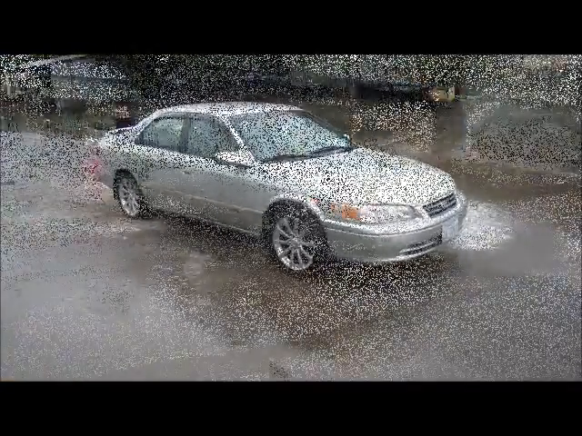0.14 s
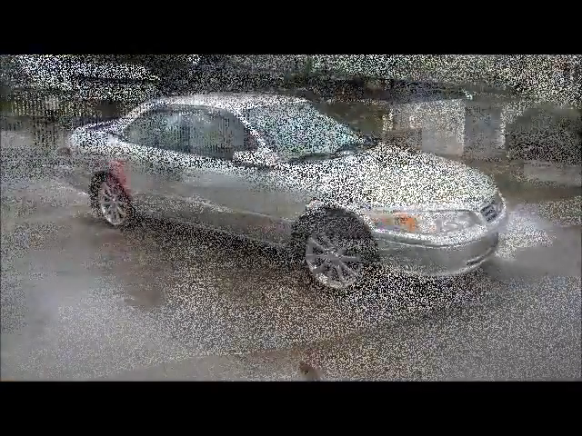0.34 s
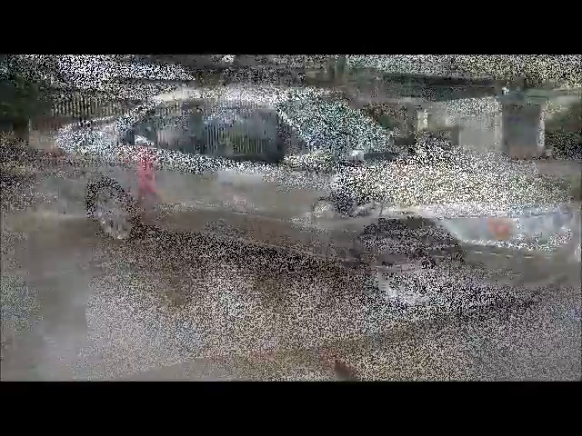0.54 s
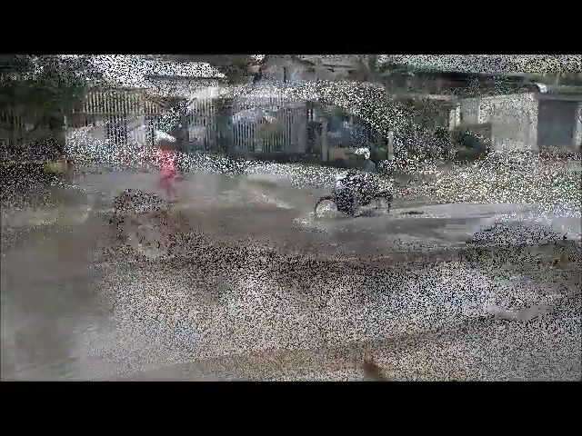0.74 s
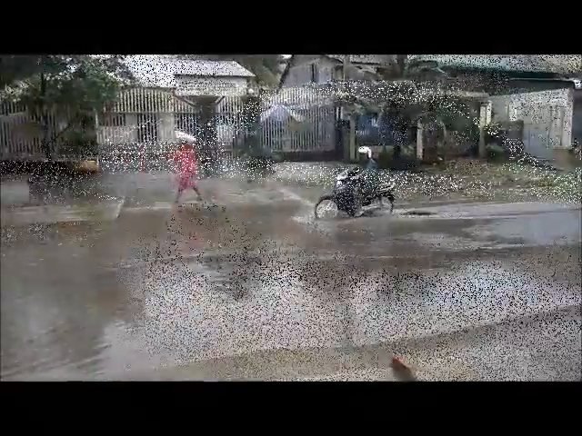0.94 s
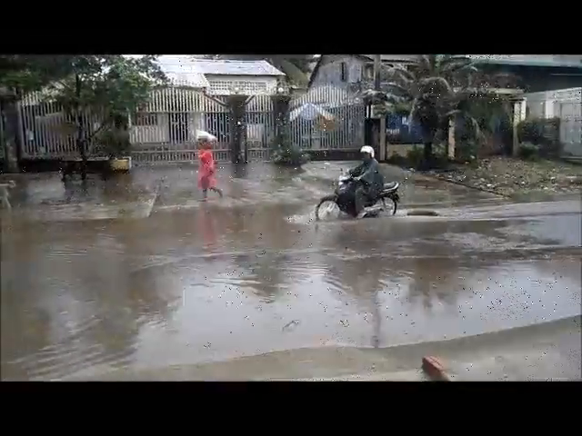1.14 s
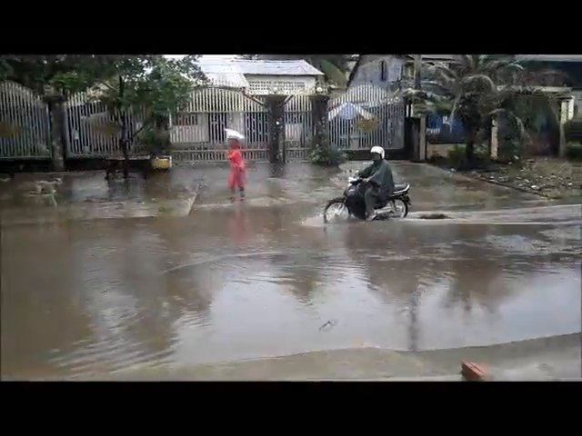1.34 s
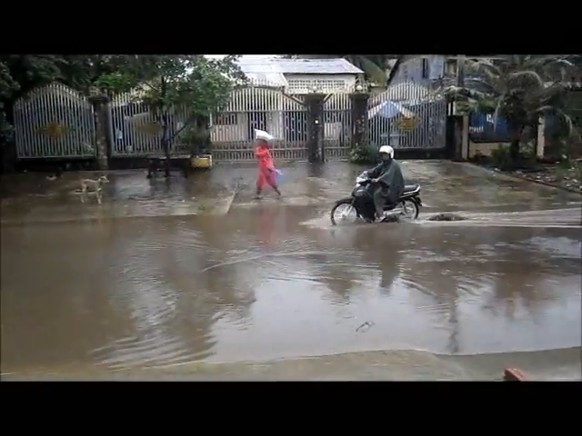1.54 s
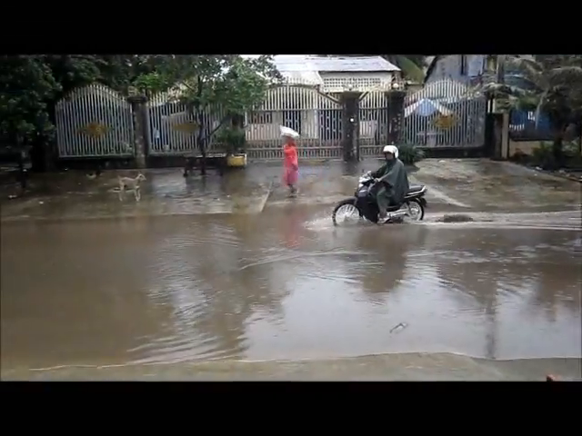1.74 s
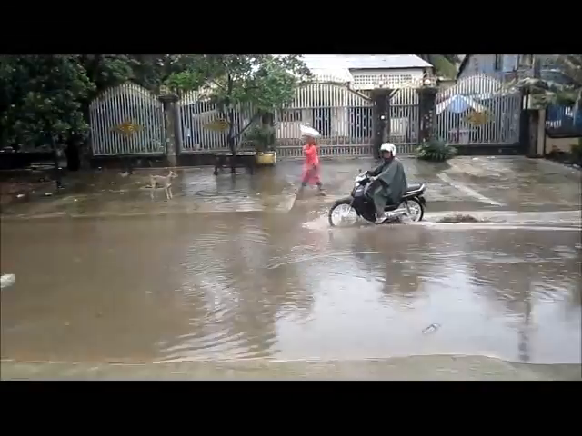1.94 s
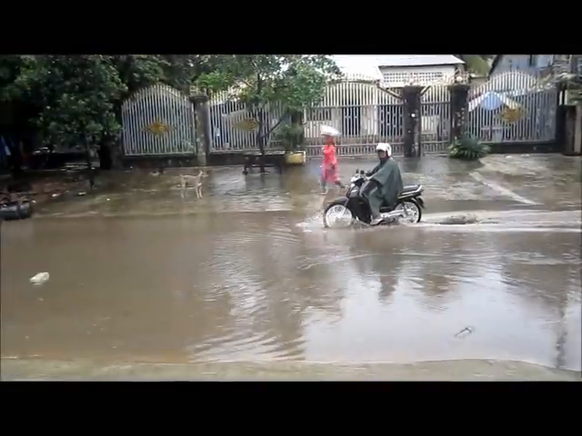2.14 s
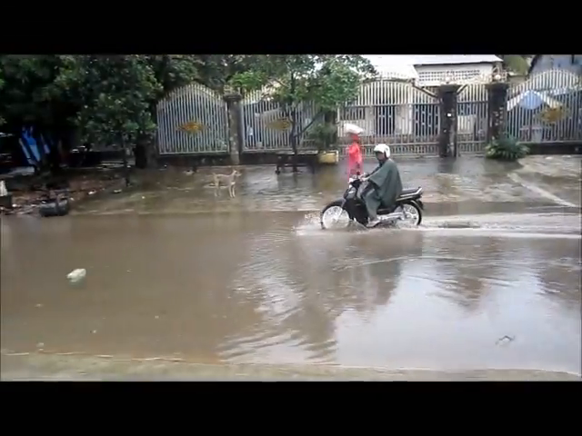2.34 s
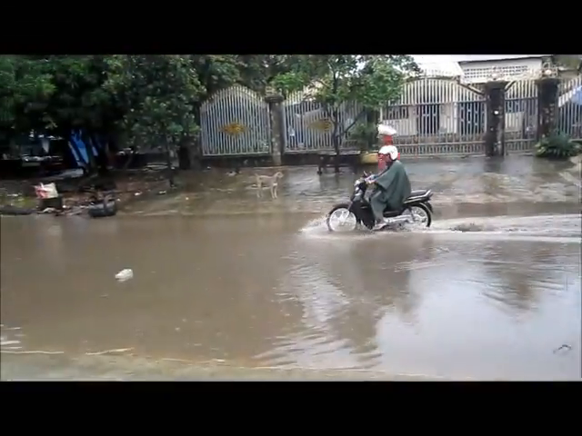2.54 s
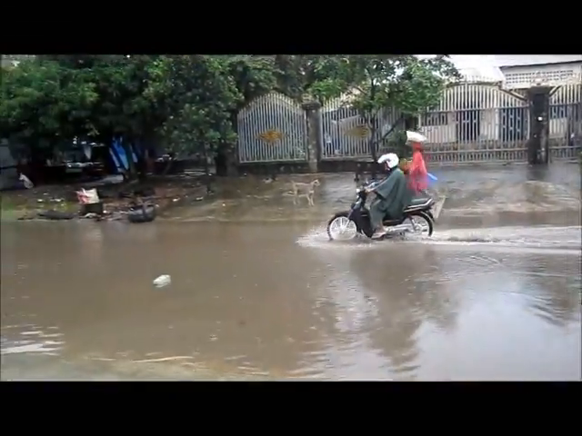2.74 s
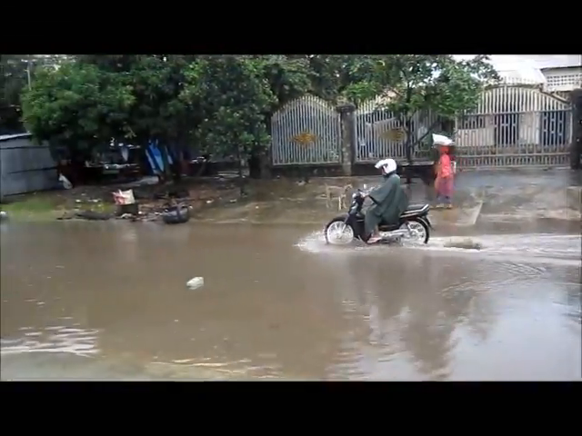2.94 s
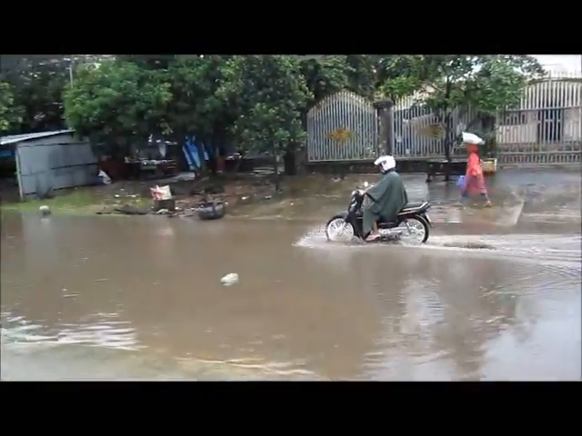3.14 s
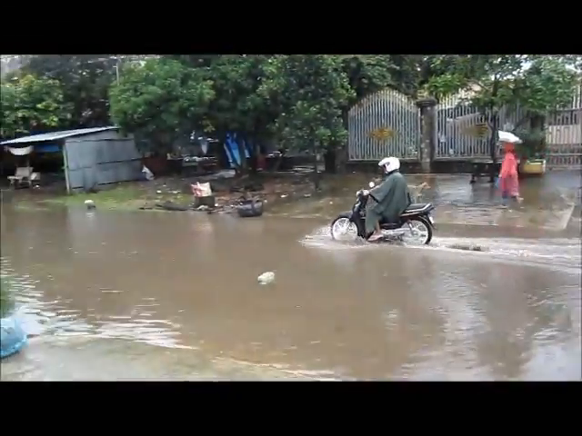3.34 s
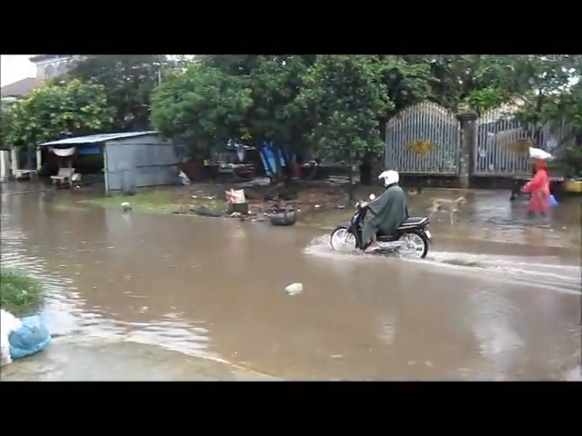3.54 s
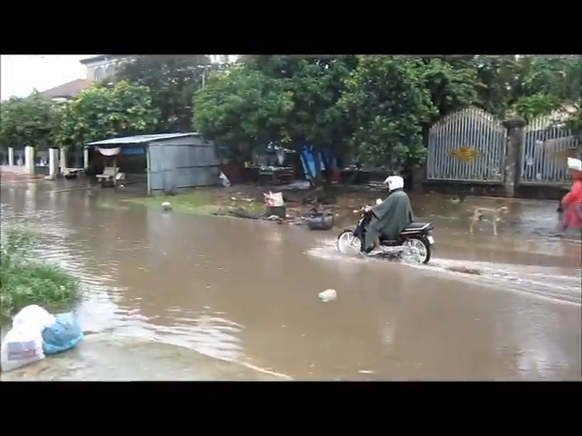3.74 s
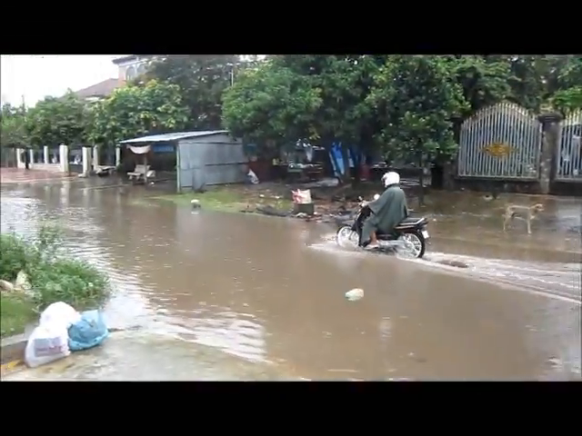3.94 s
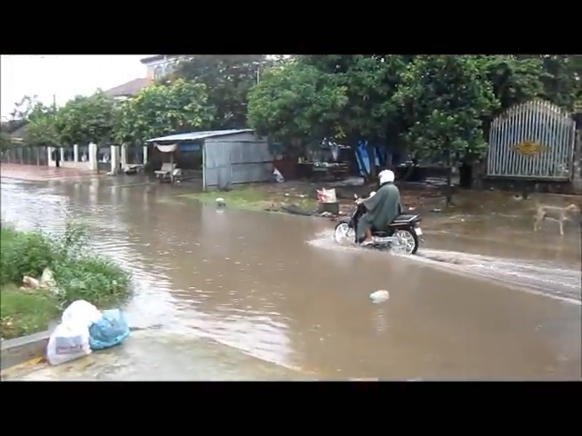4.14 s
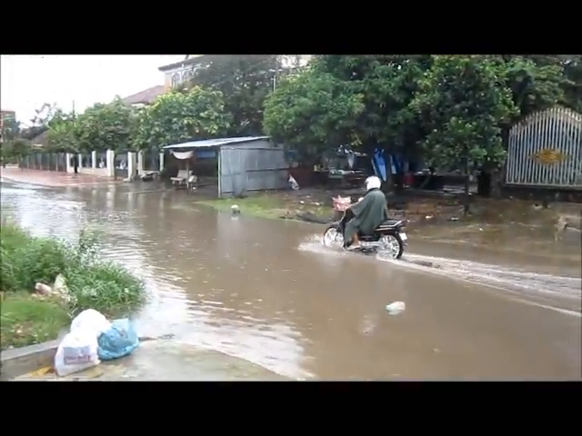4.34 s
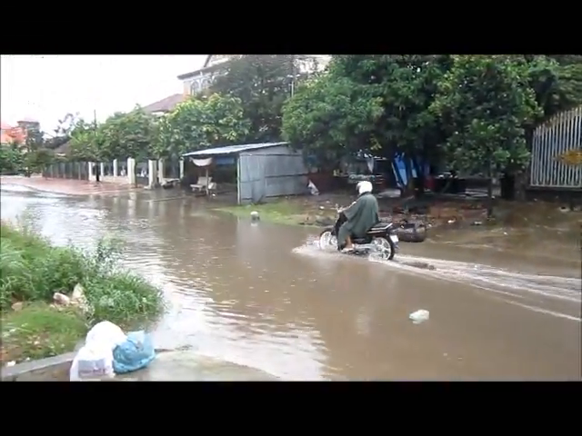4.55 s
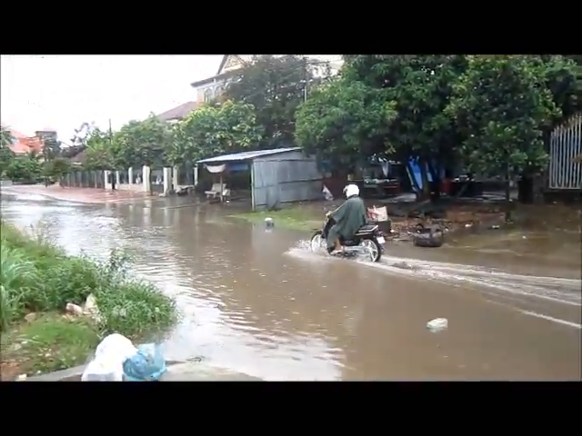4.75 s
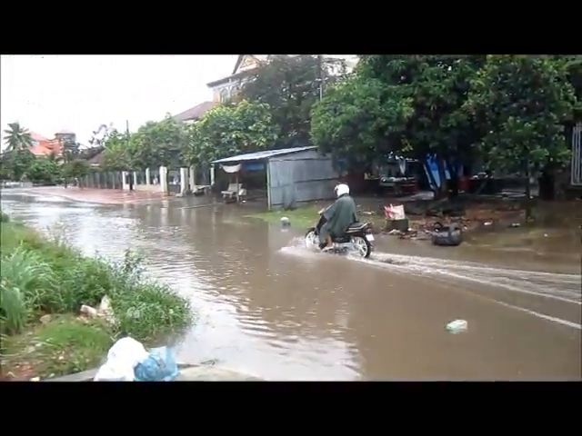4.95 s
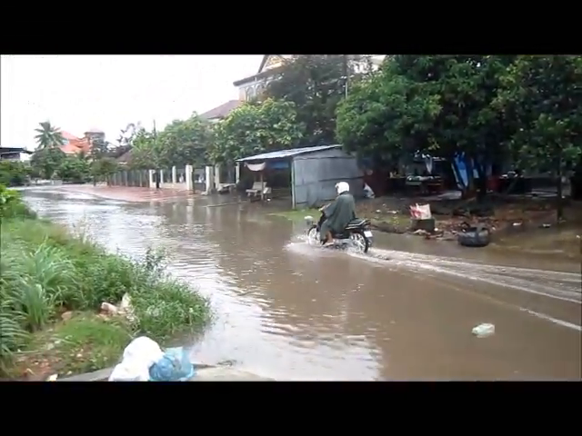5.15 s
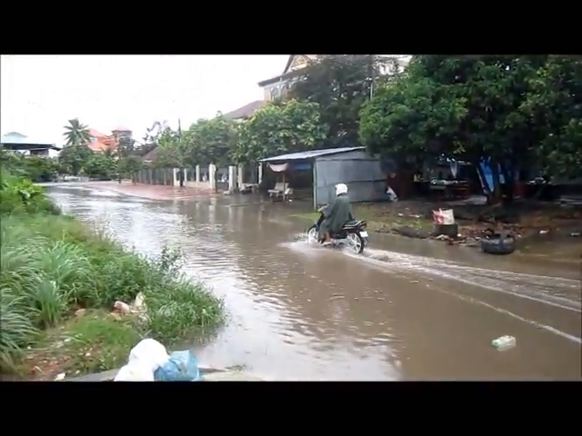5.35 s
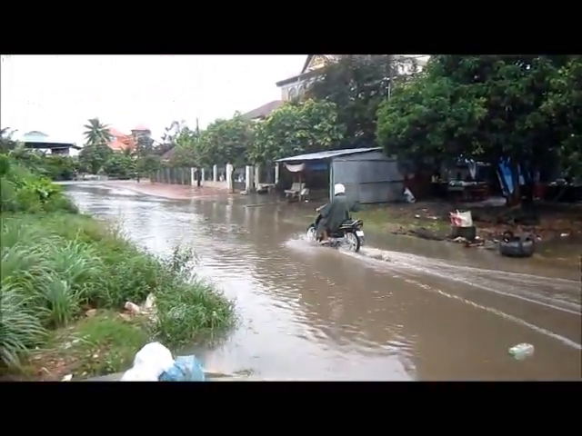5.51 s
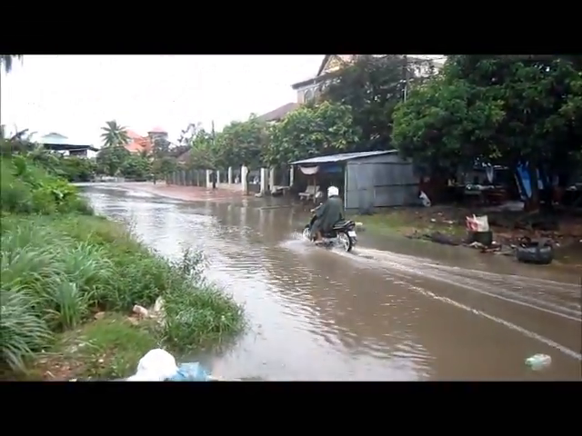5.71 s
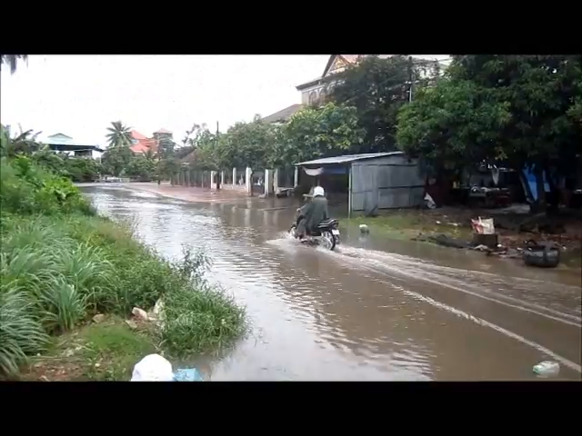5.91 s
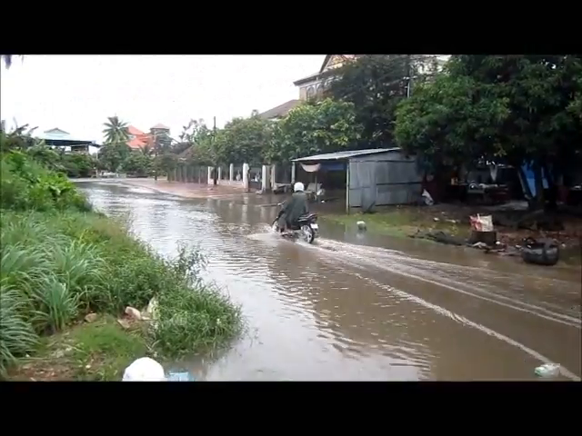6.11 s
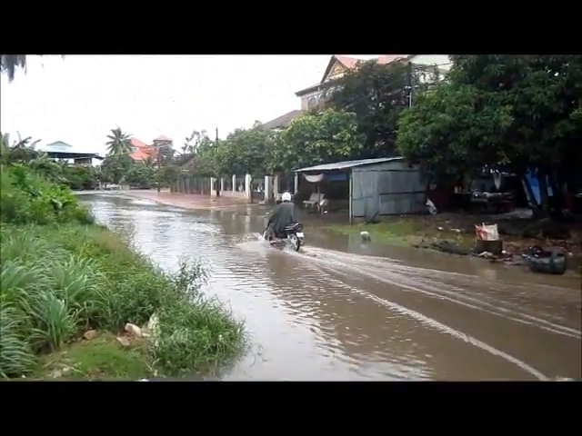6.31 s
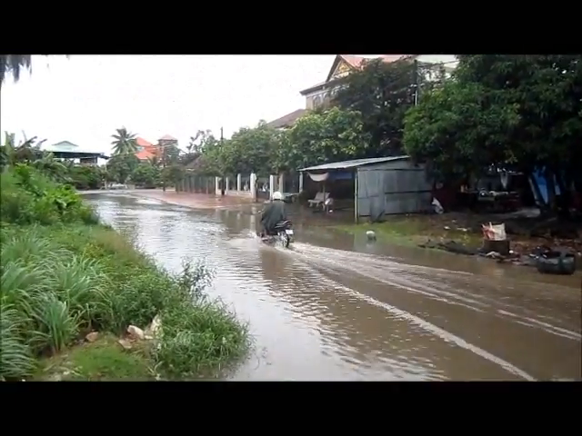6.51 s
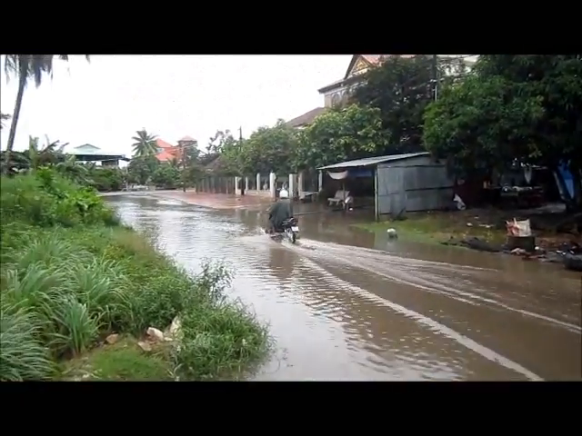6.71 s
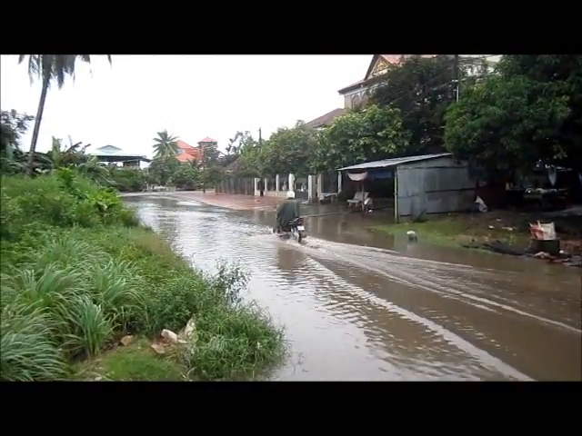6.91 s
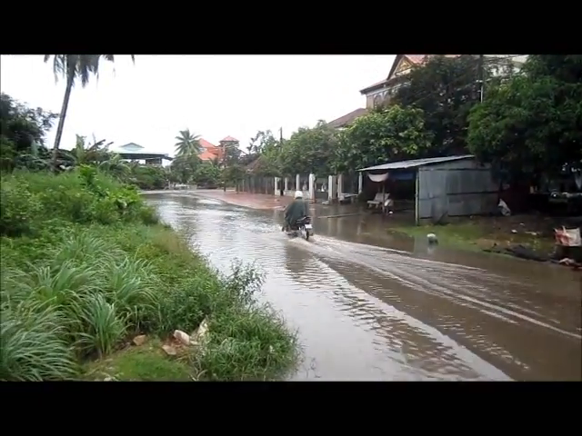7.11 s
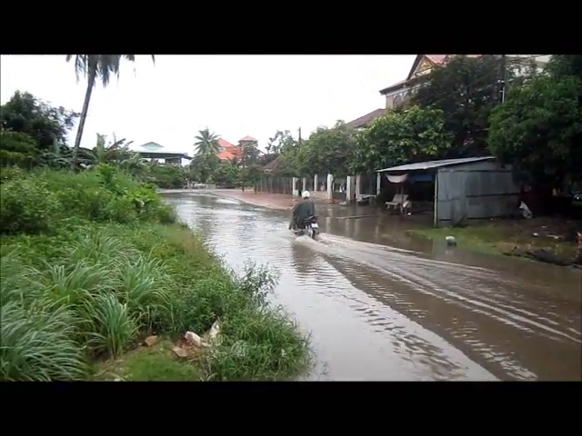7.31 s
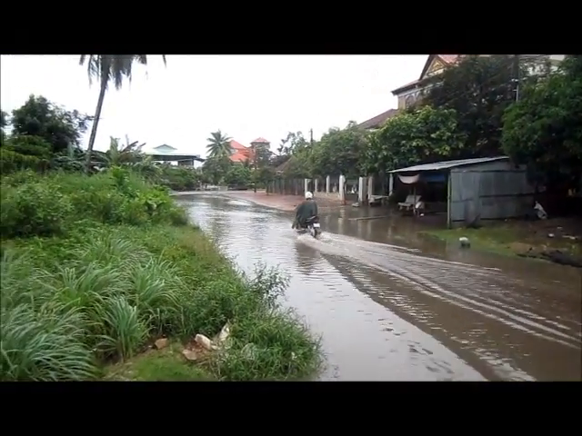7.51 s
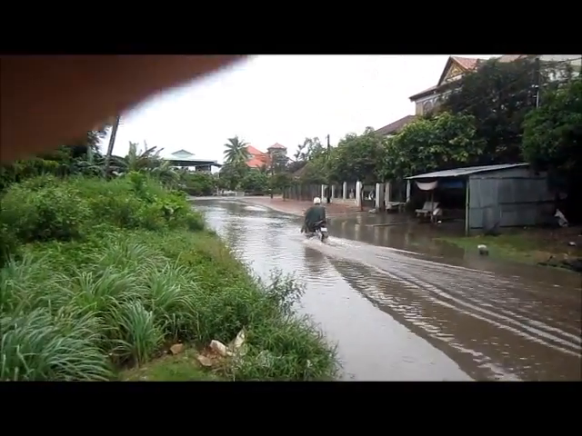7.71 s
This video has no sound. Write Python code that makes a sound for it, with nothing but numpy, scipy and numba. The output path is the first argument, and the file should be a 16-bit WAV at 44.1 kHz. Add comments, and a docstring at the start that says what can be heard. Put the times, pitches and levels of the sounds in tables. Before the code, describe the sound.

A car rushes through floodwater, sudden cut, then a slow motorbike putters and gurgles past under microphone wind, with a sharp snap and heavy handling at the end.

```python
"""A car ploughs through floodwater close by; its rush of spray stops abruptly at a cut to a second scene.
There a slow four-stroke motorbike putters past through the flood, its wheels washing the water, and draws away.
Car and bike fall off inversely with distance; puffs excite silencer resonances; water is drops and bubbles.
Throughout, wind rumbles on a hand-held camera and its whine is faint; fingers bump, tick and rub on it, a catch
snaps, and the gain control ducks after loud peaks."""
import sys
import numpy as np
from scipy import signal
from scipy.fft import rfft, irfft
from scipy.io import wavfile
from numba import njit

SR = 44100
rng = np.random.default_rng(int(sys.argv[2]) if len(sys.argv) > 2 else 0)


def unload_wav(signal):
    """Save mono or channel-first audio to the path in sys.argv[1] as 16-bit WAV at rate SR, clipped to [-1, 1]."""
    wavfile.write(
        sys.argv[1],
        SR,
        np.round(np.clip(np.atleast_2d(signal).T, -1, 1) * 32767).astype(np.int16),
    )


N = 342657
TIME = np.arange(N) / SR  # seconds


def undb(db):
    """Amplitude gain is ten to the power of decibels over twenty."""
    return 10 ** (np.asarray(db) / 20)


def unit(x):
    """Normalisation: dividing by the root mean square gives unit power."""
    return x / np.sqrt(np.mean(x ** 2))


def colour(x, points):
    """Spectral shaping by (Hz, dB) points, with 36 dB per octave of fall beyond the ends; rms 1."""
    hz, db = np.transpose(points)
    octave = np.log2(np.arange(N // 2 + 1) * SR / N + 1)
    knots = np.log2(hz)
    outside = np.abs(octave - np.clip(octave, knots[0], knots[-1]))
    gain = undb(np.interp(octave, knots, db) - 36 * outside)
    return unit(irfft(rfft(x) * gain, N))


def band(x, hz, width):
    """Simple resonance: a two-pole band-pass with gain 1 at its centre."""
    g = np.tan(np.pi * min(hz, SR / 2 - 2000) / SR)
    k = width / hz  # inverse of the quality factor
    numerator = [g * k, 0, -g * k]
    denominator = [1 + g * k + g * g, 2 * g * g - 2, 1 - g * k + g * g]
    return signal.lfilter(numerator, denominator, x)


def walk(rate):
    """Random modulation: straight lines join normal random values, drawn at this rate per second."""
    steps = rng.standard_normal(2048)
    return np.interp(TIME * rate, np.arange(len(steps)), steps)


def curve(table):
    """Linear interpolation joins (s, value) points into a curve over time."""
    return np.interp(TIME, *np.transpose(table))


def swell(s, length):
    """Gaussian rise and fall: it peaks at 1 at time s and stays above one half for the given length."""
    return .5 ** ((2 * (TIME - s) / length) ** 2)


def nearness(nearest_s, distance, speed):
    """Inverse distance law for a source passing on a straight line: gain 1 at its nearest."""
    return distance / np.hypot(distance, speed * (TIME - nearest_s))


def add(out, s, sound):
    """Superposition: a short sound is summed in at time s."""
    start = int(s * SR)
    out[start:start + len(sound)] += sound[:max(N - start, 0)]


def bubbles(low_hz, high_hz, cycles, spread_db, count):
    """Damped bubble resonance: each rings a few cycles, rising in pitch; most are faint, a few loud; rms 1."""
    out = np.zeros(N)
    for when, pitch, chance in rng.random((count, 3)):
        hz = low_hz * (high_hz / low_hz) ** pitch
        age = np.linspace(0, 1, int(cycles * SR / hz) + 2)  # fraction of its life
        # the root of pitch makes up for the shorter ring of high bubbles
        size = undb(-spread_db * np.log(.01 + .99 * chance)) * np.sqrt(hz)
        ring = np.sin(2 * np.pi * cycles * age * (1 + 0.064 * age))
        add(out, when * N / SR, size * np.exp(-5 * age) * ring)
    return unit(out)


def drops(per_second, spread_db):
    """Random impulse process: dense tiny impacts of uneven size; rms 1."""
    size = undb(spread_db * np.minimum(rng.exponential(size=N), 4))
    hits = rng.random(N) < per_second / SR
    return unit(hits * rng.standard_normal(N) * size)


def car():
    """Displaced water: the tyres heave up a low wave, and its sheets break into drops and bubbles."""
    # Spectra of the water. Each row: frequency in Hz, level in dB.
    spray_ahead = [(320, -38), (550, -18), (694, -10), (928, 3), (1010, -5), (1140, 1), (1720, -13),
                   (2020, -23), (2270, -20), (2580, -32), (3040, -17), (3470, -26), (4000, -40),
                   (5200, -63), (8800, -120)]
    spray_beside = [(320, -50), (550, -8.5), (729, -11.5), (793, -2.5), (1020, -3), (1300, -2),
                    (1630, -7.5), (2060, -28), (2350, -25), (2620, -28), (3250, -29), (3500, -31),
                    (4000, -33), (5200, -53), (8800, -120)]
    mist_colour = [(1180, -36), (2000, -3), (2120, -21), (2310, -0.5), (2440, -1.5), (2990, -0.5),
                   (3490, -10.5), (4180, -9.5), (6690, -6.5), (7950, -11), (9350, -18), (12000, -20.5),
                   (15500, -32)]
    surge_colour = [(35, -37), (60, -6), (102, 1), (150, -7.5), (243, -3), (374, -7), (481, -10.5),
                    (555, -22), (600, -15), (780, -29), (1320, -120)]
    # small bubbles where the sheet lands
    fizz_colour = [(2250, -9), (2550, 0), (3000, -12), (4000, -9)]
    surge_db, spray_db, mist_db, fizz_db = -24, -27, -44, -41.5  # at the nearest point
    sheet_mist_db = 3  # lift of the mist as the sheet lands

    sheet = swell(0.63, length=0.25)  # the front wheel's sheet of water lands
    surge = colour(rng.standard_normal(N), surge_colour)
    surge = surge * undb(surge_db + 1.2 * sheet + 0.73 * walk(12.2))

    water = drops(18000, 1.3) + .5 * bubbles(610, 3400, cycles=14, spread_db=0.1, count=6000)
    beside = np.interp(TIME, [.33, .53], [0, 1])  # from ahead to alongside
    spray = (1 - beside) * colour(water, spray_ahead) + beside * colour(water, spray_beside)
    spray = spray * undb(spray_db)

    mist = colour(drops(11000, 1.2) + 0.67 * rng.standard_normal(N), mist_colour)
    mist = mist * undb(mist_db + sheet_mist_db * sheet + .5 * walk(40.0))

    fizz = colour(bubbles(1900, 3900, cycles=10, spread_db=2.2, count=4000), fizz_colour)
    fizz = fizz * undb(fizz_db) * sheet
    near = nearness(nearest_s=0.33, distance=3.8, speed=3.4)  # s, m, m/s
    return (surge + spray + mist + fizz) * near


def street():
    """Stationary background: steady distant broadband hiss, and the camera's thin wavering whine."""
    # The open street. Each row: frequency in Hz, level in dB.
    air_colour = [(120, -37), (200, -1), (253, -7.5), (333, -13), (515, -11), (715, -9.5), (769, -13.5),
                  (957, -20), (1190, -12), (1620, -19.5), (1780, -16), (2020, -23), (6960, -33),
                  (8050, -32.5), (15500, -41.5)]
    # Faint whine of the camera. Each row: frequency in Hz, rms level in dB.
    whine_tones = [(7881, -78)]
    air_db = -49
    air = colour(rng.standard_normal(N), air_colour) * undb(air_db + .5 * walk(2.89))
    whine = np.zeros(N)
    for hz, db in whine_tones:
        phase = 2 * np.pi * np.cumsum(hz + 14 * walk(60)) / SR
        whine += np.sqrt(2) * undb(db) * np.sin(phase)
    return air + whine


def wind():
    """Turbulent pressure at the microphone port: low-frequency noise, a steady breeze with a few gusts."""
    # Spectrum of the rumble. Each row: frequency in Hz, level in dB.
    wind_colour = [(10, -11), (20, 0.5), (32, 1), (50, -4.5), (72, -12), (102, -11.5), (170, -26.5),
                   (300, -38.5), (600, -60)]
    # Gusts. Each row: time in seconds, rise in dB.
    gust_times = [(3.9, 1.5), (4.6, 4.5), (5.13, 5.5), (5.42, 7.5), (7.25, 5.5), (7.55, 8.5)]
    breeze_db, gust_s = -30, .16
    gusts = sum(rise_db * swell(s, gust_s) for s, rise_db in gust_times)
    return colour(rng.standard_normal(N), wind_colour) * undb(breeze_db + gusts + 1.26 * walk(9))


def handling():
    """Impact on the case: soft bumps are damped low oscillations, ticks and scuffs are short bands of noise."""
    # Soft bumps. Each row: start in seconds, peak in dB, ring in Hz, upper limit of the treble in Hz.
    bumps = [(1.317, -16.5, 150, 398), (2.609, -19.5, 102, 650), (3.590, -14, 79, 500),
             (4.013, -12.5, 85, 450), (4.517, -20.5, 133, 453), (4.729, -18.5, 110, 420),
             (4.929, -14, 114, 480), (5.307, -21.5, 120, 600), (5.417, -11, 60.6, 250),
             (6.222, -24.5, 110, 600), (6.722, -22.5, 90, 400), (7.578, -10, 91, 900),
             (7.593, 4, 171, 1000), (7.641, 10.5, 61, 700)]
    # Finger ticks and scuffs. Each row: start in seconds, peak in dB, centre in Hz, width in Hz,
    # 60 dB decay time in seconds of the noise ahead of its resonance.
    ticks = [(1.114, -20, 5150, 3400, 0.014), (1.114, -22, 1100, 700, .012),
             (1.713, -42.5, 4330, 2000, .02), (2.537, -29, 4230, 1700, 0.0061),
             (2.61, -37, 1500, 2200, .02), (3.510, -43, 3500, 3000, .015), (4.098, -40, 4900, 1500, .06),
             (4.118, -36.5, 4880, 1510, 0.017), (5.093, -36, 7950, 7000, 0.0058),
             (5.306, -31.5, 1100, 600, 0.028), (5.414, -31, 900, 1400, 0.0091),
             (5.414, -24.5, 430, 260, 0.083), (5.716, -43, 7900, 8000, 0.0062),
             (7.577, -19, 1500, 4000, 0.021), (7.585, -26.5, 4500, 10000, 0.049),
             (7.5925, -9, 3400, 8000, 0.0041), (7.601, -28, 3500, 5000, 0.011),
             (7.611, -20, 7200, 6500, 0.008), (7.638, 2.5, 813, 300, 0.01),
             (7.647, -20, 3000, 6000, 0.0068), (7.697, -24, 1000, 1400, .006)]
    out = np.zeros(N)
    t = np.arange(SR // 5) / SR
    for s, db, hz, bright_hz in bumps:
        rock = np.cos(2 * np.pi * hz * t) * np.exp(-t * hz * 2.06)
        bump = signal.sosfilt(signal.butter(2, bright_hz, fs=SR, output="sos"), rock)
        add(out, s, -undb(db) * bump / np.abs(bump).max())
    for s, db, hz, width, t60 in ticks:
        burst = rng.standard_normal(len(t)) * undb(-60 * t / t60)
        tick = band(band(burst, hz, width), hz, width)
        add(out, s, undb(db) * tick / np.abs(tick).max())
    return out


def exhaust():
    """Source and resonator: one soft puff for each firing of the single cylinder rings the silencer."""
    # Engine speed. Each row: time in seconds, firings per second.
    firing_rate = [(1.15, 17.02), (1.8, 17.81), (2.4, 17.54), (2.95, 17.88), (3.15, 15.62), (3.45, 15.57),
                   (3.8, 16.21), (4.1, 16.32), (4.5, 18.25), (5.1, 18.75), (5.9, 18.95), (6.3, 18.06),
                   (6.8, 18.57), (7.5, 17.9)]
    # Silencer resonances. Each row: frequency in Hz, width in Hz, gain in dB.
    silencer = [(111.3, 112, -5.5), (191, 104, -16)]
    first_firing_s = 1.150
    cruise_rate, throttle_db_per_rate = 17.55, 0.93  # firings/s, dB per firing/s: faster is louder
    drive_db = -15.5  # impulse ahead of the silencer, at cruising rate

    rate = curve(firing_rate)
    db = drive_db + throttle_db_per_rate * (rate - cruise_rate)
    turns = np.cumsum(rate * (TIME > first_firing_s)) / SR  # one firing for each whole count
    firings = np.flatnonzero(np.diff(np.ceil(turns)) > 0)
    pulses = np.zeros(N)
    pulses[firings] = undb(db[firings] + 1.0 * rng.standard_normal(len(firings)))
    # the valve opens over a few milliseconds, so the puff has no treble
    t = np.arange(-400, 401) / SR
    puffs = signal.fftconvolve(pulses, np.exp(-(t / 0.0014) ** 2), "same")
    puffs = puffs * (1 + 0.88 * rng.standard_normal(N))  # the gas is turbulent
    ring = np.zeros(N)
    for hz, width, gain_db in silencer:
        ring += undb(gain_db) * band(band(puffs, hz, width), hz, width)
    return -2.5 * np.roll(ring, -int(.003 * SR))  # inverted, and 3 ms earlier


def drone():
    """Frequency and amplitude modulation: a wavering engine tone lies under the putter and swells twice."""
    # Swells. Each row: time in seconds, length in seconds, rise in dB.
    swells = [(3.68, 0.56, 9), (4.65, 0.34, 12.5)]
    pitch_hz, level_db = 205.4, -51.5  # level at the nearest point
    db = level_db + sum(rise_db * swell(s, length) for s, length, rise_db in swells)
    gain = np.sqrt(2) * undb(db + 2.2 * walk(14))
    phase = 2 * np.pi * np.cumsum(pitch_hz + 4.49 * walk(25)) / SR
    return gain * np.sin(phase)


def wash(near):
    """Entrained air: the wheels' bow wave froths and gurgles, and single large bubbles plop as damped tones."""
    # Spectrum of frothing water. Each row: frequency in Hz, level in dB.
    wash_colour = [(150, -17), (250, -3), (279, 1), (437, -5), (523, -12), (701, -0.5), (865, -1),
                   (1300, -13), (1570, -10.5), (2140, -30), (3080, -24.5), (3580, -32), (5150, -26.5),
                   (7000, -37), (9100, -66), (15400, -120)]
    # Large bubbles in the wake. Each row: start in seconds, starting amplitude in dB, pitch in Hz.
    plops = [(1.508, -31, 650), (1.652, -33.5, 1010), (1.716, -31.5, 386), (1.830, -33, 815),
             (1.900, -34, 720), (2.873, -31.5, 960), (3.094, -32, 1070), (3.538, -33, 820),
             (3.696, -38, 706), (4.694, -36, 756), (4.831, -30.5, 740), (5.279, -34.5, 820)]
    wash_db, falloff = -44, 1.14  # level at the nearest point, power of the nearness
    froth = colour(drops(5000, 2.7) * undb(1.2 * walk(18)), wash_colour)
    gurgle = colour(bubbles(350.0, 2550, cycles=26, spread_db=1.0, count=2600), wash_colour)
    lull_db = -3.5 * swell(4.53, length=.6)  # the wash sinks briefly
    out = (undb(-2.0) * froth + undb(-4.5) * gurgle) * undb(wash_db + lull_db) * near ** falloff
    t = np.arange(SR // 12) / SR
    for s, peak_db, hz in plops:
        ring = np.sin(2 * np.pi * hz * t * (1 + 1.2 * t))  # the pitch rises
        add(out, s, undb(peak_db) * np.exp(-t / 0.0048) * ring)
    return out


def snap():
    """Modal excitation: a plastic catch snaps home and rings the case, with a short chatter of noise."""
    # First contact, then the catch. Each row: start in seconds, relative strength in dB.
    contacts = [(4.367, -20.5), (4.3685, 3)]
    # Modes of the case. Each row: frequency in Hz, relative level in dB, 60 dB decay time in seconds.
    case_modes = [(1210, -2, 0.0068), (1665, -23.5, 0.039), (2430, -7, 0.0081), (3360, -8, 0.0081),
                  (4430, -6.5, 0.0092), (4770, -24, 0.048), (5620, -1, 0.0062), (6600, -2, 0.0076),
                  (8760, -14, 0.0067), (9730, -24, 0.029), (10400, -14.5, 0.009), (12600, -18, .005),
                  (14700, -21, .004)]
    peak_db = 1.5
    out = np.zeros(N)
    t = np.arange(SR // 10) / SR
    ring = np.zeros(len(t))
    for k, (hz, db, t60) in enumerate(case_modes):
        decay = np.exp(-np.log(1000) * t / t60)
        # neighbouring modes swing opposite ways
        ring += (-1) ** k * undb(db) * decay * np.sin(2 * np.pi * hz * t)
    chatter = band(rng.standard_normal(len(t)), 4600, 6500) * undb(-16.5 - 60 * t / 0.032)
    for s, db in contacts:
        add(out, s, undb(db) * (ring + chatter))
    return undb(peak_db) * out / np.abs(out).max()


def rub():
    """Friction as many small impacts: skin drags over the microphone port, presses, holds and eases off."""
    # Spectrum of rubbing skin. Each row: frequency in Hz, level in dB.
    rub_colour = [(22, -4), (55, 3.5), (110, -7.5), (220, -14), (400, -21), (800, -33.5), (2000, -50),
                  (6000, -58), (15000, -65)]
    start_s, attack_s, hold_s = 7.565, .025, .14  # the hold counts from the start
    rub_db, fade_db_per_s = -9.5, 100
    age = TIME - start_s
    press = np.clip(age / attack_s, 0, 1) * undb(-fade_db_per_s * np.maximum(age - hold_s, 0))
    return colour(drops(4000, 2.3), rub_colour) * undb(rub_db) * press


def scene():
    """Superposition of sources: the car, then the passing motorbike, over street, wind and handling."""
    cut_s = 1.151  # the car scene ends and the motorbike scene begins
    after = np.clip((TIME - cut_s) / 0.0027, 0, 1)
    near = nearness(nearest_s=1.7, distance=7.24, speed=3.11)  # s, m, m/s
    bike = (exhaust() + drone()) * near + wash(near)
    vehicles = (1 - after) * car() + after * bike
    return (vehicles + street() + wind() + handling() + rub() + snap())[None]


@njit
def follow(x, attack, release):
    """Peak detection: an envelope that rises fast and sinks slowly."""
    out, e = np.empty(len(x)), 0.
    for i in range(len(x)):
        level = abs(x[i])
        e += (level - e) * (attack if level > e else release)
        out[i] = e
    return out


def record(dry):
    """Dynamic range limiting: gain ducks after loud peaks; what still exceeds the limit clips, the top is cut."""
    attack_s, release_s, threshold_db = .0008, .9, -13
    top_hz = 15850
    envelope = follow(dry[0], 1 / (1 + attack_s * SR), 1 / (1 + release_s * SR))
    gain = undb(threshold_db) / np.maximum(envelope, undb(threshold_db))
    # the gain takes a moment to come down
    gain = 1 - signal.sosfilt(signal.butter(1, 7, fs=SR, output="sos"), 1 - gain)
    clipped = np.clip(dry * gain, -.97, .97)
    return signal.sosfilt(signal.ellip(10, .2, 80, top_hz, fs=SR, output="sos"), clipped)


dry = scene()
out = record(dry)
unload_wav(out)
```